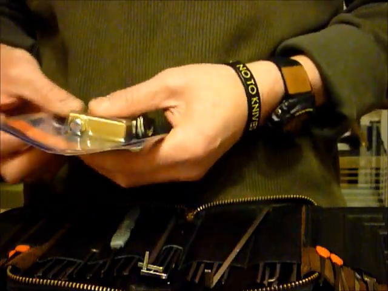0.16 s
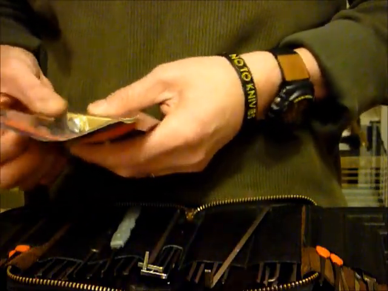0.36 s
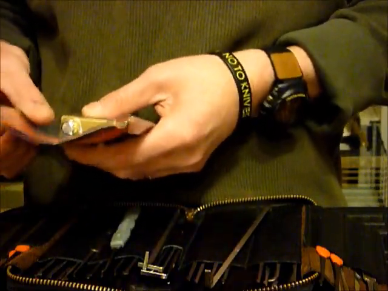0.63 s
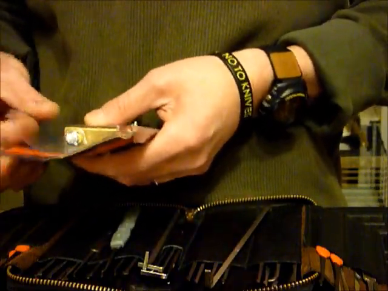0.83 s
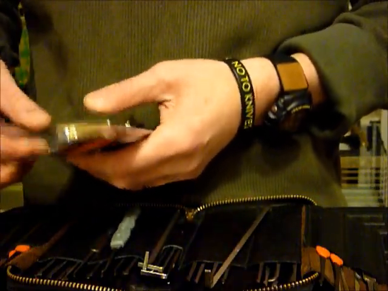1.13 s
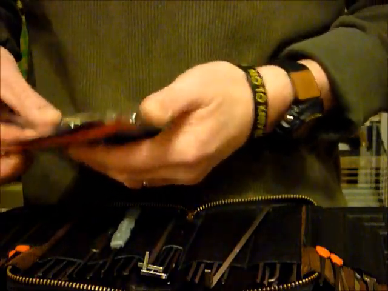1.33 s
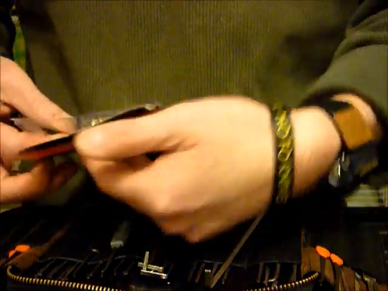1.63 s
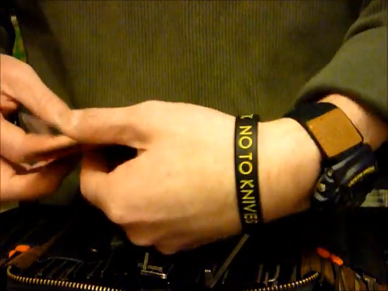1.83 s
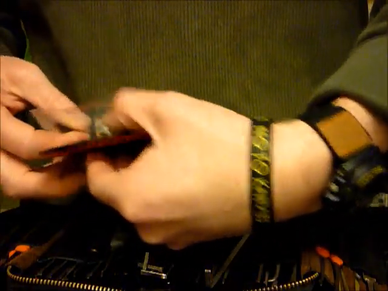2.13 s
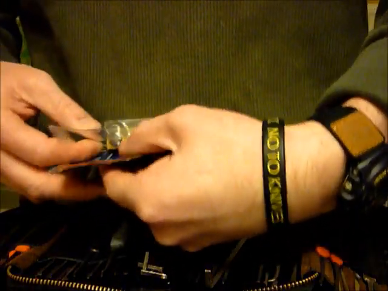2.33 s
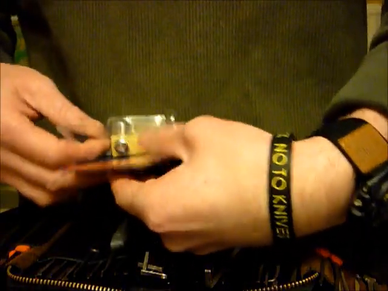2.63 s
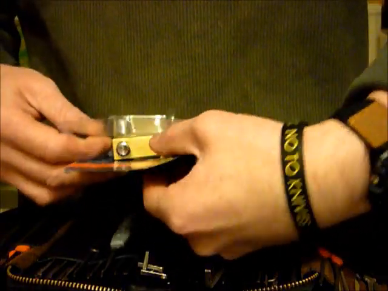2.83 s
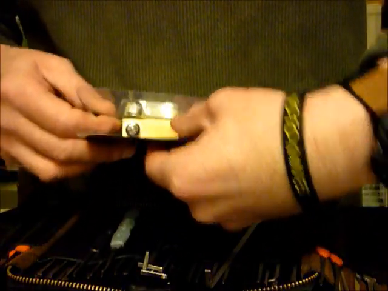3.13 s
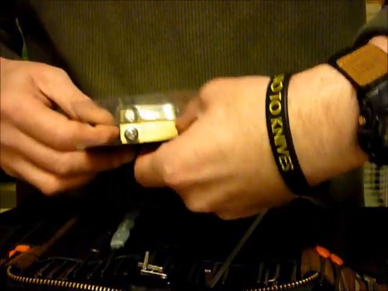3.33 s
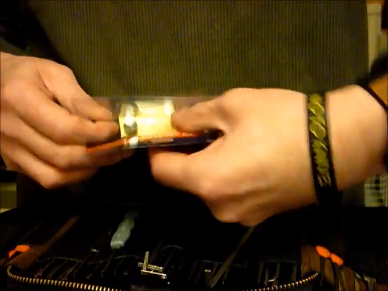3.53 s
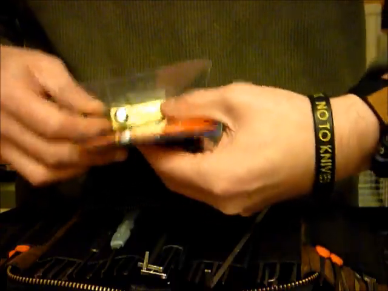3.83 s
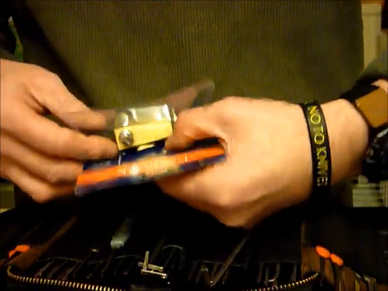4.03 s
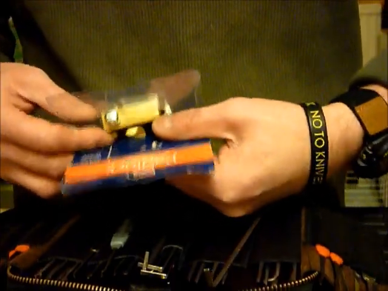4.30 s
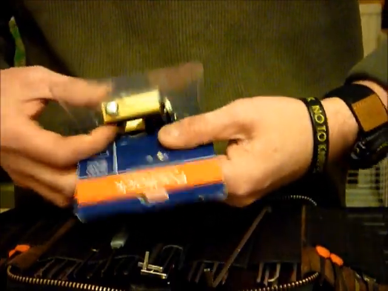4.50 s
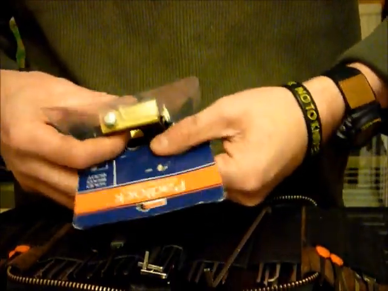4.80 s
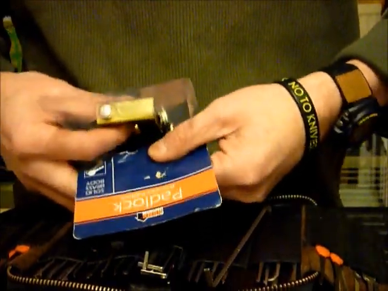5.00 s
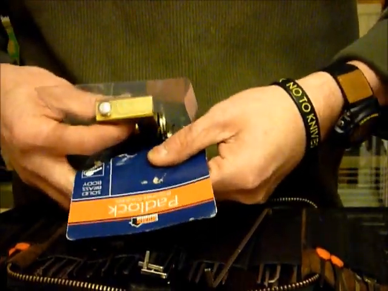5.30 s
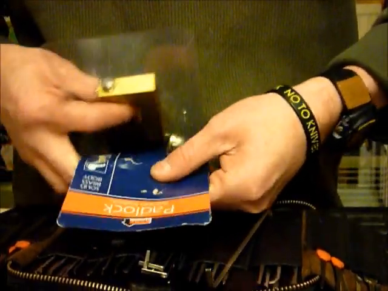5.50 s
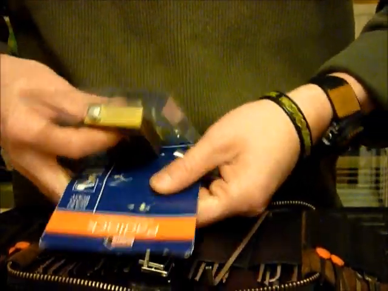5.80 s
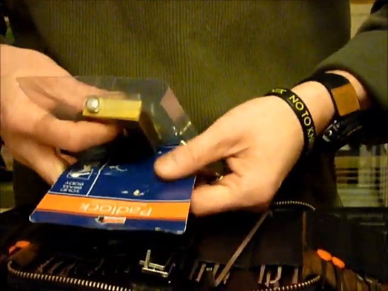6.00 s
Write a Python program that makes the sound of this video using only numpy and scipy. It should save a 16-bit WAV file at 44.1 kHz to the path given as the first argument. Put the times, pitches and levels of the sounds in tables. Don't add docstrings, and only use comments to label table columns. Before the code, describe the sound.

Hands work a padlock in a stiff plastic and card pack, close to a cheap hissy microphone in a small furnished room. Quiet grainy rubbing and little ticks lead to one huge snap, then more crackling and flips, the loudest cracks near the end. Small keys jingle thinly at the finish.

```python
import sys
import numpy as np
from scipy import signal
from scipy.io import wavfile

SR = 44100
rng = np.random.default_rng(int(sys.argv[2]) if len(sys.argv) > 2 else 0)


def convert_level_to_amplitude(level_db):
    exponent = np.asarray(level_db, float) / 20
    return 10 ** exponent


def dump(signal):
    limited = np.clip(np.atleast_2d(signal).T, -1, 1)
    pcm = np.round(limited * 32767).astype(np.int16)
    wavfile.write(sys.argv[1], SR, pcm)


N = 271215

# f/Hz, density/dB per Hz
HISS_SPECTRUM = [(18, -35), (30, -37.5), (54, -16), (184, -5.5), (217, -8), (267, -7.5), (478, -11.5),
                 (525, -8), (710, -20.5), (1030, -16.5), (7800, -32), (10100, -55), (17200, -120)]
# f/Hz, T60/s
ROOM_T60 = [(150, 0.14), (400, 0.34), (1040, 0.5), (2760, 0.37), (7280, 0.36)]
# f/Hz, level/dB
ROOM_COLOUR = [(150, -1.5), (600, -2.5), (1200, 1.5), (2000, 0.5), (4000, -5), (7000, -2)]
# t/s, level/dB
ECHOES = [
    (.0058, -19),
    (.0095, -25),
    (0.0145, -25.5),
    (.0215, -17.5),
]
# t/s, f/Hz, level/dB, free ring/s
KEY_TOUCHES = [(5.617, 7480, -40, 0.039), (5.664, 7500, -37, .02), (5.703, 7450, -38, 0.074),
               (5.78, 7461, -31.5, 0.0097), (5.849, 7461, -38, 0.013), (5.857, 7470, -29.5, 0.026),
               (5.886, 7510, -24, 0.0067), (5.92, 7461, -51, 0.076), (6.01, 7520, -50, 0.036),
               (5.67, 7600, -44, .008), (5.853, 7650, -39, .008), (5.892, 7700, -35, .015),
               (5.81, 7461, -53, .03), (5.667, 5679, -51, 0.044), (5.729, 5679, -49, 0.0098),
               (5.78, 5679, -58, 0.018), (5.807, 5679, -51, 0.0062), (5.89, 5679, -49, 0.16),
               (6.022, 5679, -61, 0.039)]
# f/Hz, width/Hz, level/dB
SHELL_MODES = [(282, 19, -17.5), (390, 19, -30.5), (516, 20, -5.5), (587, 17, -23.5), (780, 40, 3.5),
               (865, 21, -12.5), (1100, 70, -9.5), (1390, 33, -38), (2290, 50, -24), (3350, 140, -12)]
# t/s, level/dB, tautness/dB (taut is brighter)
GRIP = [(0, -41, -0.5), (.25, -51, 1.5), (.45, -46, 0), (.9, -46.5, 0.5), (1.3, -48, 0), (1.7, -51.5, 2),
        (2.6, -45.5, -0.5), (2.75, -48, -0.5), (3, -53, 2), (3.45, -52, 2.5), (3.72, -39, 1),
        (3.95, -46, -1), (4.16, -44, -3), (4.4, -52.5, -0.5), (4.76, -44, -1), (5.3, -48, 0),
        (5.65, -43, 1), (6.15, -61.5, 6)]
# t of peak/s, rise/s, fall/s, level/dB, tautness/dB
SLIDES = [(.29, 0.043, .056, -48, -2.5), (.396, .008, .022, -45.5, 3.5), (1.35, .023, .025, -57.5, 10.5),
          (1.535, .0064, .037, -50.5, 5), (1.799, .015, .013, -50.5, 0), (1.935, .0035, .012, -45, -6.5),
          (2.147, .009, .02, -45, -7), (3.527, .012, .022, -35.5, 3), (3.609, 0.0093, .014, -34, -2.5),
          (3.66, .015, .03, -39, 2), (4.045, .004, .03, -43, 1.5), (4.083, .022, 0.018, -29, 4),
          (4.298, .014, .012, -39.5, -1), (4.501, .012, .007, -58, 13.5), (4.632, .022, .008, -37, 2),
          (5.017, .021, .005, -36, -2.5), (5.465, 0.011, .026, -35.5, -1.5), (5.5, .011, .029, -34, 9.5),
          (5.62, 0.023, .03, -38.5, -7), (5.649, .006, .01, -42.5, 3), (5.864, .044, .012, -43, 3),
          (.47, .002, 0.016, -39, 1.5), (.716, 0.0033, 0.012, -36, 1), (.942, 0.0022, 0.019, -35, -1)]
# low f/Hz, high f/Hz, level/dB
RUB_BANDS = [(234, 1500, -9), (1200, 4820, -8.5), (3670, 12900, 2)]
# level/dB, share of tautness/ratio
GRIP_SHAPE = [(3, -1.1), (0, 0), (-9, .9)]
# level/dB, share of tautness/ratio
SLIDE_SHAPE = [(-2, -0.99), (0, 0.1), (-3.5, 0.014)]
# t/s, crack level/dB, crack f/Hz, click level/dB, click f/Hz
SNAPS = [(0.467, -24.5, 5030, -32, 3340), (0.7116, -37, 6340, -38, 2700), (0.9386, -37, 5140, -37.5, 2340),
         (1.5281, -33.5, 6170, -51, 3340), (2.146, -36, 5720, -40.5, 1800), (2.5029, -3, 6460, -21, 4400),
         (2.7184, -31.5, 6680, -41, 2980), (3.6185, -33, 6400, -26.5, 1820), (3.6345, -11, 5940, -19, 3500),
         (3.777, -30, 5460, -33.5, 2390), (4.2111, -27, 4900, -33, 3500), (4.2271, -23.5, 5760, -30, 2800),
         (4.5151, -24.5, 4450, -33, 2710), (4.567, -28.5, 5850, -35, 2180),
         (4.6676, -35, 5270, -34.5, 3090), (4.7763, -33.5, 5500, -35, 3600),
         (5.016, -30, 4830, -41.5, 2800), (5.1255, -21, 4400, -24.5, 1780),
         (5.4732, -14, 5000, -16.5, 2100), (5.5142, -2, 4900, -16, 3800), (5.6243, -30, 4300, -38, 2300),
         (5.6345, -28, 6500, -23, 3300), (5.7193, -24, 4000, -34, 1900), (5.8578, -26.5, 5140, -30, 2450)]
# t/s, crack level/dB, crack f/Hz, click level/dB, click f/Hz
BIG_SNAPS = [
    (2.5005, -39, 5000, -35, 2500),
    (2.5044, -8.5, 4500, -18.5, 1900),
    (2.5044, -24, 5600, -17, 3200),
    (3.6345, -19, 7000, -32, 2040),
    (.716, -40, 4900, -31, 3000),
    (5.1262, -19.5, 7100, -20, 3340),
    (5.4733, -16.5, 7100, -19.5, 3130),
    (5.473, -18, 4300, -19.5, 1100),
    (5.5152, -5, 5600, -18, 2250),
    (.9385, -25, 5400, -32.5, 3500),
]
# t/s, knock level/dB, knock f/Hz, thump level/dB, thump f/Hz
THUMPS = [(0.465, -34.5, 1210, -36.5, 555), (0.713, -26.5, 1100, -32.5, 517), (0.939, -27, 850, -34, 400),
          (2.142, -38, 760, -33.5, 314), (2.503, -18, 1050, -20, 450), (2.504, -28.5, 282, -34, 138),
          (2.659, -30.5, 840, -42, 427), (4.558, -37, 800, -35, 403), (3.62, -26, 950, -19, 540),
          (3.622, -24, 1200, -30.5, 274), (3.776, -35, 1080, -36, 503), (4.218, -26, 726, -29, 380),
          (4.225, -30, 804, -28, 620), (4.667, -28.5, 474, -34, 231), (4.704, -35, 740, -36, 416),
          (4.922, -27, 685, -30.5, 348), (5.014, -31, 820, -36, 670), (5.126, -18.5, 780, -25, 480),
          (5.472, -16.5, 910, -20.5, 600), (5.473, -20, 1500, -24, 352), (5.518, -15.5, 770, -17, 520),
          (5.634, -21, 800, -27.5, 415), (5.683, -25, 1550, -49, 686), (5.859, -28, 1200, -33.5, 674)]
# t/s, crack level/dB, click level/dB, click f/Hz
TICKS = [(0.0782, -38.5, -41.5, 2550), (0.302, -42, -47, 2880), (0.404, -38.5, -55, 2030),
         (0.5985, -44, -60, 1940), (0.8883, -46, -43, 3100), (1.1253, -35.5, -46, 1940),
         (1.5145, -38, -60, 2640), (1.5984, -46, -46.5, 2500), (1.6104, -44, -51, 2140),
         (1.9372, -38.5, -48, 1900), (2.1331, -41, -49, 1890), (2.2726, -38, -47.5, 2120),
         (2.4352, -47, -64, 1830), (6.0447, -55, -45, 2300), (2.9532, -45, -52, 1840),
         (3.5687, -53, -42, 2980), (3.6034, -41, -39, 2720), (3.9184, -40, -41.5, 1800),
         (3.9554, -56, -41, 3000), (3.9776, -39, -47, 2100), (4.2918, -33.5, -37.5, 1830),
         (4.3331, -36.5, -49, 2040), (4.4413, -38.5, -51, 1910), (4.6972, -40.5, -39.5, 3150),
         (4.924, -30.5, -36, 2240), (5.1142, -38, -40, 1980), (5.243, -32, -39.5, 2110),
         (5.439, -31.5, -36.5, 2450), (5.6825, -28, -42, 1830), (5.8301, -37, -35, 2650)]
# t/s, crack level/dB
PRICKLES = [
    (.2784, -48.5),
    (1.063, -47.5),
    (1.8806, -48),
    (2.117, -45),
    (2.8287, -46),
    (3.068, -51),
    (3.1033, -47),
    (5.7794, -40),
    (6.026, -48),
]
# t/s, level/dB
TAPS = [(.082, -35), (.601, -39), (1.129, -38), (1.616, -42), (1.944, -32), (2.667, -33.5), (3.171, -40),
        (3.515, -39.5), (5.111, -34), (5.225, -30), (5.428, -36), (5.803, -37), (5.83, -32), (6.046, -37.5)]


def at_hz(points, hz):
    table = np.array(points)
    return np.interp(np.log(hz), np.log(table[:, 0]), table[:, 1])


def rms_one(x):
    return x / np.sqrt(np.mean(x ** 2) + 1e-20)


def band(x, low_hz, high_hz):
    sos = signal.butter(2, [low_hz, high_hz], "band", fs=SR, output="sos")
    return signal.sosfilt(sos, x + 1e-18) * np.sqrt(SR / 2 / (high_hz - low_hz))


def resonance(x, hz, width_hz):
    r = np.exp(-np.pi * width_hz / SR)
    zeros = [(1 - r * r) / 2, 0, (r * r - 1) / 2]
    poles = [1, -2 * r * np.cos(2 * np.pi * hz / SR), r * r]
    return signal.lfilter(zeros, poles, x)


def hiss():
    edges = 30 * 2 ** np.arange(0, 8.6, .5)
    white = rng.standard_normal((2, N))
    murmur = np.zeros(N)
    for k, (low, high) in enumerate(zip(edges, edges[1:])):
        density = convert_level_to_amplitude(at_hz(HISS_SPECTRUM, np.sqrt(low * high)))
        murmur += density * np.sqrt(high - low) * band(white[k % 2], low, high)
    return convert_level_to_amplitude(-50.5) * rms_one(murmur)


def room(x):
    level_db, start_s, rise_s = -33, 0.00091, 0.00057
    t = np.arange(SR // 2) / SR
    edges = 100 * 2 ** np.arange(0, 7, .5)
    white = rng.standard_normal((2, len(t)))
    tail = np.zeros(len(t))
    for k, (low, high) in enumerate(zip(edges, edges[1:])):
        share = np.sqrt((high - low) / (SR / 2))
        decay = convert_level_to_amplitude(at_hz(ROOM_COLOUR, low) - 60 * t / at_hz(ROOM_T60, low))
        tail += band(white[k % 2], low, high) * share * decay
    rise = 1 - np.exp(-np.maximum(t - start_s, 0) / rise_s)
    early_boost = 1 + 1.32 * np.exp(-t / 0.009)
    return signal.fftconvolve(x, convert_level_to_amplitude(level_db) * tail * rise * early_boost)[:N]


def echoes(x):
    return x + sum(convert_level_to_amplitude(db) * np.roll(x, round(s * SR)) for s, db in ECHOES)


def keys():
    free_t60_s, damped_t60_s, swing_hz, swing_db, attack_s = 0.61, .07, 28, 3.5, 0.0011
    t = np.arange(SR // 4) / SR
    out = np.zeros(N + SR)
    phases = rng.uniform(0, 2 * np.pi, len(KEY_TOUCHES))
    for (s, hz, db, free_s), phase in zip(KEY_TOUCHES, phases):
        fade_db = -60 * t / free_t60_s - 60 * np.maximum(t - free_s, 0) / damped_t60_s
        swing = swing_db * np.sin(2 * np.pi * swing_hz * t + phase)
        envelope = convert_level_to_amplitude(db + fade_db + swing) * (1 - np.exp(-t / attack_s))
        out[round(s * SR):][:len(t)] += envelope * np.sin(2 * np.pi * hz * t)
    return out[:N]


def shell(x, direct_db):
    out = convert_level_to_amplitude(direct_db) * x
    for k, (hz, width_hz, db) in enumerate(SHELL_MODES):
        out = out + convert_level_to_amplitude(db) * (-1) ** k * resonance(x, hz, width_hz)
    return out


def rubbing():
    t = np.arange(N) / SR
    grip_s, grip_db, grip_taut_db = np.transpose(GRIP)
    sizes = convert_level_to_amplitude(3.7 * np.minimum(rng.exponential(1, N), 5)) * rng.choice([-1, 1], N)
    grains = rms_one(sizes * (rng.random(N) < 900 / SR))
    slide = 0.52 * grains + 0.59 * rng.standard_normal(N)
    chatter = 0.55 * grains + 0.7 * rng.standard_normal(N)
    humps = []
    for peak_s, rise_s, fall_s, _, _ in SLIDES:
        swell_in = (np.minimum(t - peak_s, 0) / rise_s) ** 2
        swell_out = np.maximum(t - peak_s, 0) / fall_s
        humps.append(np.exp(-swell_in - swell_out))
    out = np.zeros(N)
    for (low_hz, high_hz, db), grip, swell in zip(RUB_BANDS, GRIP_SHAPE, SLIDE_SHAPE):
        steady = convert_level_to_amplitude(db + grip[0] + np.interp(t, grip_s, grip_db + grip[1] * grip_taut_db))
        swells = np.zeros(N)
        for (_, _, _, peak_db, taut_db), hump in zip(SLIDES, humps):
            swells += convert_level_to_amplitude(swell[0] + peak_db + swell[1] * taut_db) * hump
        out += band(steady * slide + swells * chatter, low_hz, high_hz)
    return out


def buckles(table, lower_db, breadth, spread):
    t = np.arange(1500) / SR
    fractures = rng.standard_normal((len(table), 2, len(t)))
    out = np.zeros((2, N + len(t)))
    for (s, upper_db, upper_hz, low_db, low_hz, ms), noise in zip(table, fractures):
        x = t / (np.clip(ms, .1, 12) / 1000)
        at = round(s * SR)
        parts = [(upper_db, upper_hz), (low_db + lower_db, low_hz)]
        for (db, hz), draw in zip(parts, noise):
            force = draw * x * np.exp(-x)
            click = (np.arange(len(t)) == np.argmax(x >= 1)) * np.sign(force[1])
            late_click = np.roll(click, int(200 * abs(draw[0])))
            both = np.array([click + spread * force / np.linalg.norm(force), late_click])
            ringing = resonance(both, hz, breadth * hz)
            burst, even = resonance(ringing, hz, 2 * breadth * hz)
            even = even * np.linalg.norm(burst) / np.linalg.norm(even)
            out[:, at:at + len(t)] += convert_level_to_amplitude(db) * np.array([burst, even]) / np.abs(burst).max()
    return out[:, :N]


def snaps():
    snap_ms, big_snap_ms, tick_ms, flex_ms, tap_ms = .62, .48, .65, 1.464, 1.58
    sharp = [(*row, snap_ms) for row in SNAPS]
    sharp += [(*row, big_snap_ms) for row in BIG_SNAPS]
    creases = list(TICKS) + [(s, db, db - 11, 2100) for s, db in PRICKLES]
    crack_hz = 5600 + 600 * rng.uniform(-1, 1, len(creases))
    for (s, crack_db, click_db, click_hz), hz in zip(creases, crack_hz):
        sharp.append((s, crack_db, hz, click_db, click_hz, tick_ms))
    dull = [(*row, flex_ms) for row in THUMPS]
    dull += [(s, db, 800, db - 17, 215, tap_ms) for s, db in TAPS]
    bright = buckles(sharp, lower_db=8.5, breadth=0.4, spread=1.1)
    return bright + buckles(dull, lower_db=5.0, breadth=0.43, spread=0.92)


def scene():
    near, around = shell(snaps(), direct_db=1.0) + shell(rubbing(), direct_db=-0.5)
    jingle = keys()
    direct = echoes(near + jingle)
    diffuse = room(around + 0.26 * jingle)
    return (direct + diffuse + hiss())[None]


def low_pass(x):
    return signal.sosfilt(signal.butter(12, 8050, fs=SR, output="sos"), x)


def record(dry):
    offset, cutoff_hz = -.0641, 8250
    loaded = np.clip(dry + offset, -.97, .97)
    steep = signal.cheby2(10, 60, cutoff_hz * 1.079, fs=SR, output="sos")
    cut = signal.sosfilt(steep, loaded - offset) + offset
    return low_pass(np.clip(cut, -1, 1))


dry = scene()
out = record(dry)
dump(out)
```